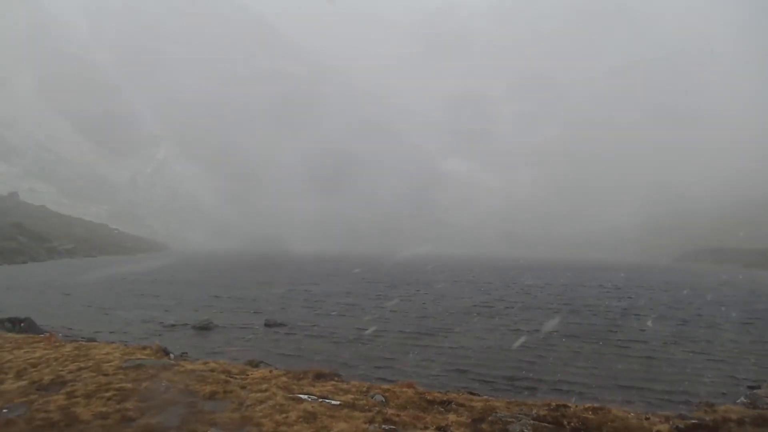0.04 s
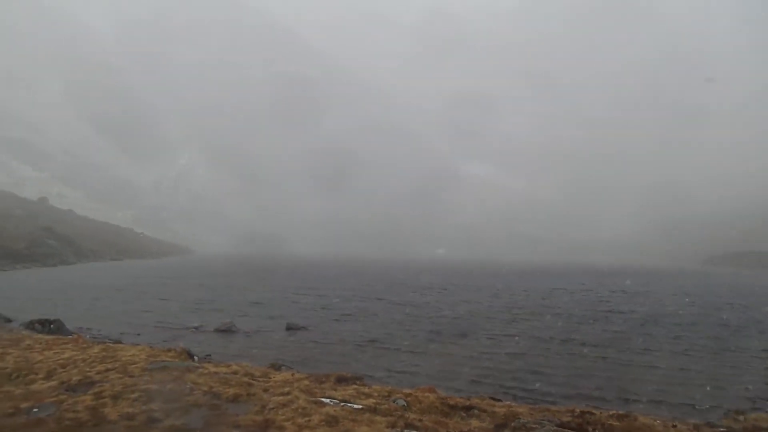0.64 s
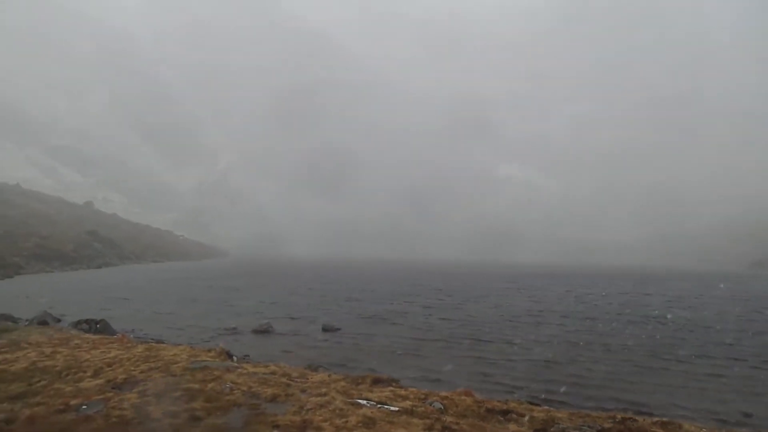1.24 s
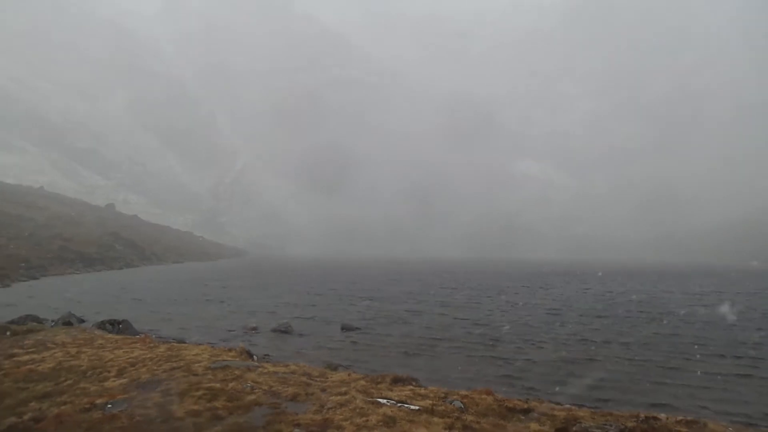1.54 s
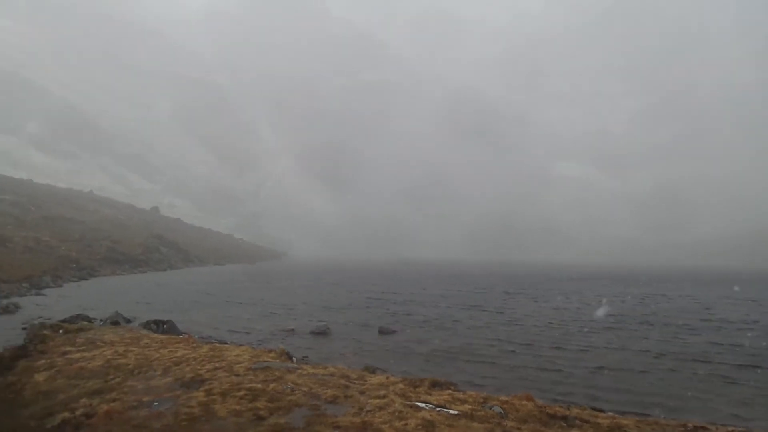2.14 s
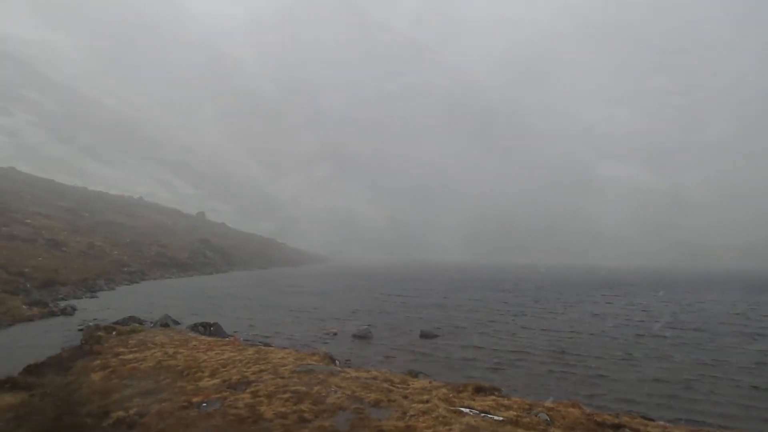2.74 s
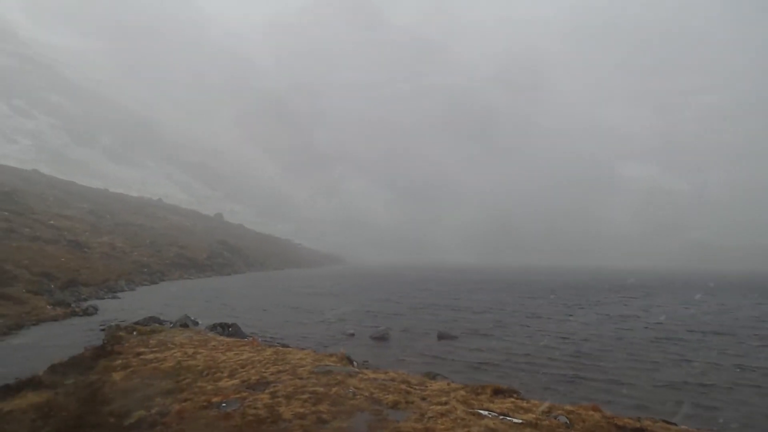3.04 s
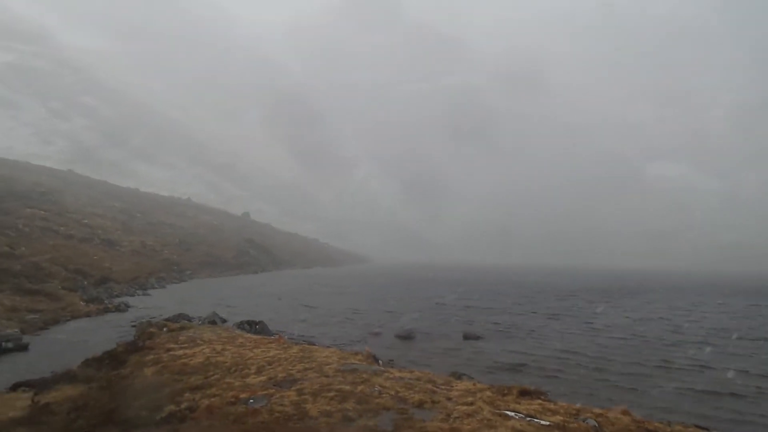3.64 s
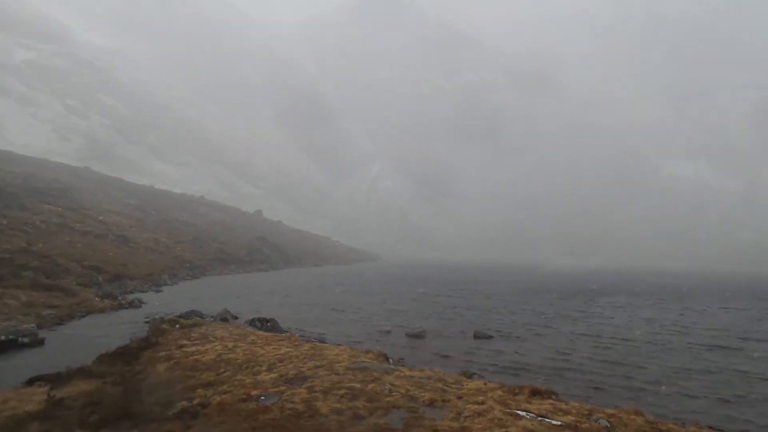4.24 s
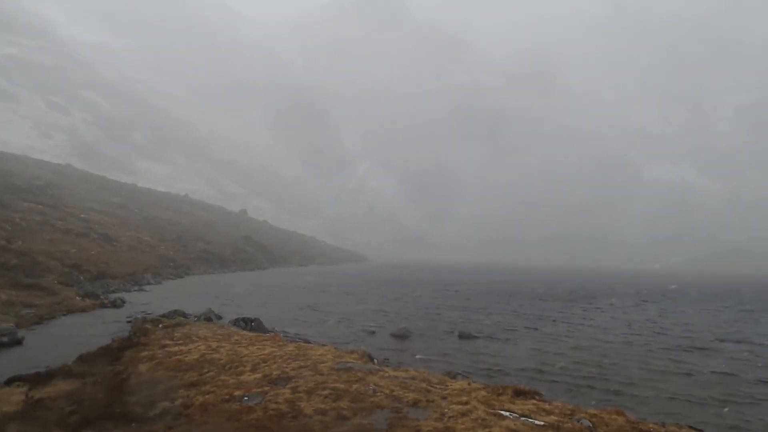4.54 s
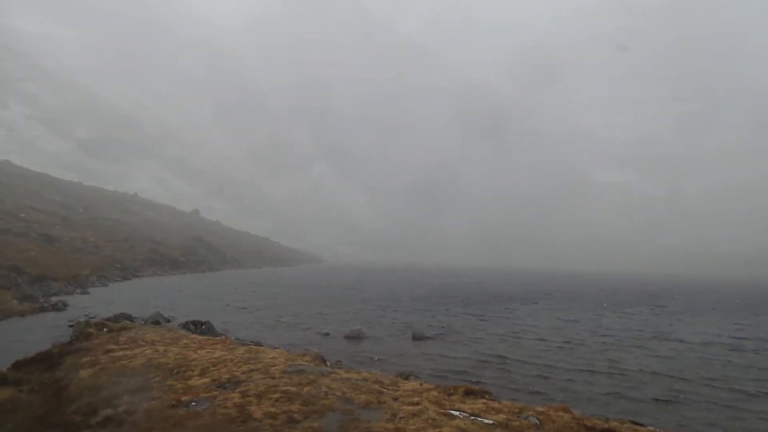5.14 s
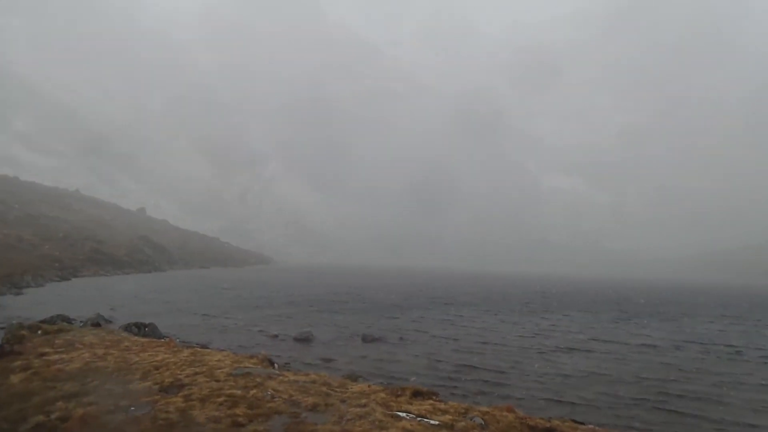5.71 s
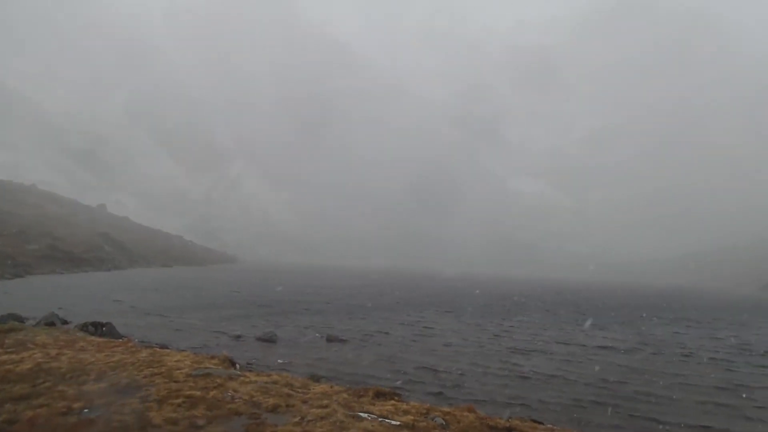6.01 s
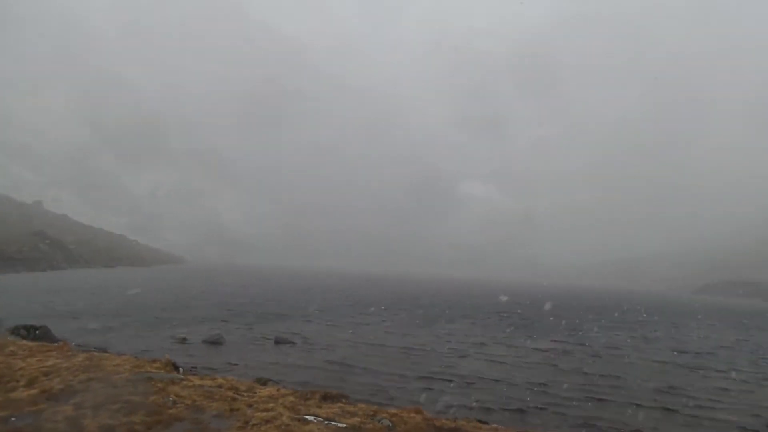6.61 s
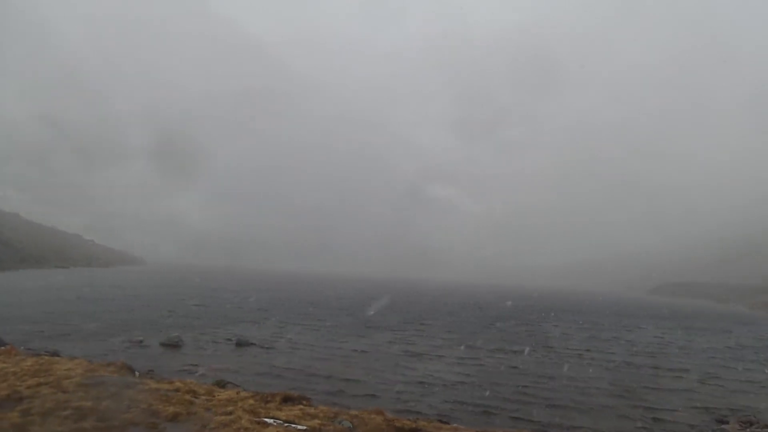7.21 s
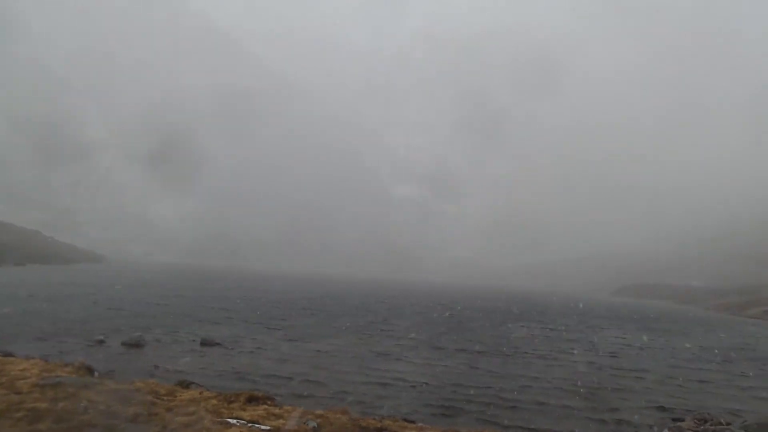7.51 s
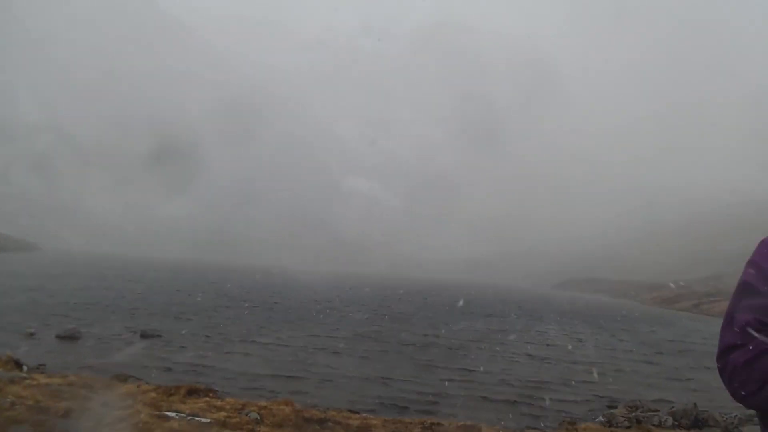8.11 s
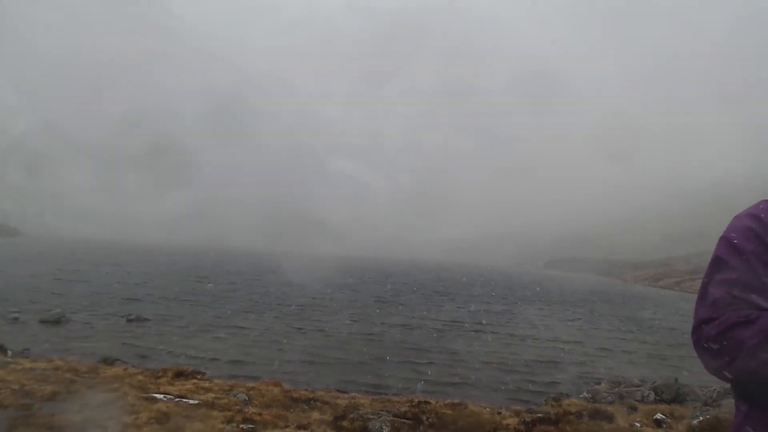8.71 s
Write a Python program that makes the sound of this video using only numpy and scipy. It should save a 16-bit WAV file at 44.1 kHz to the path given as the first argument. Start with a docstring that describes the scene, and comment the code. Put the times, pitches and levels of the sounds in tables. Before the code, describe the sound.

For about nine seconds, gusty wind buffets a microphone under a hood on a lake shore, rumbling with irregular thumps and ragged puffs. It starts strong and turns raspy in gusts around 0.3, 1 and 1.8 seconds, then again near 4.1, 6 and 6.5 seconds, with shorter surges afterward. Throughout, icy pellets tick brightly and irregularly on the microphone's housing, loudest at about 0.1, 1.8, 7.4, 8.1 and 8.9 seconds. Finer sleet patters on the jacket in small flurries, and wet flakes burst on the hood with tiny snaps. Farther off, sleet hisses steadily on water and grass over the faint wash of the lake. The sleet and wash ease between roughly 3 and 5 seconds, then build from 6 seconds, with the ticking busiest near the end. Nearly all the sound is in the left channel.

```python
"""Gusty wind rumbles and rasps while icy pellets tick and patter over a steady hiss.
Sleet is blowing across a mountain lake onto a camera held under a hood. Swirls of air (eddies) buffet
the microphone's opening (the port) and turn raspy in the gusts. Pellets tick on the camera and patter
on the jacket, and wet flakes burst on the hood. Farther off, sleet hisses on water and grass and the
lake washes softly. Nearly all of the sound is in the left channel."""
import sys
import numpy as np
from scipy import signal
from scipy.fft import rfft, irfft, next_fast_len
from scipy.io import wavfile
from scipy.ndimage import uniform_filter1d, minimum_filter1d, map_coordinates

SR = 44100
rng = np.random.default_rng(int(sys.argv[2]) if len(sys.argv) > 2 else 0)


def generate_wav(sig):
    """Save sig (samples, or channels by samples) to the path in sys.argv[1] as 16-bit PCM at SR."""
    pcm = np.round(np.clip(np.atleast_2d(sig).T, -1, 1) * 32767).astype(np.int16)
    wavfile.write(sys.argv[1], SR, pcm)


N = 395136

# strength of the wind at the port: (time [s], level [dB])
WIND = [(0.0, -25), (0.58, -23.5), (1.03, -25.0), (1.57, -24.5), (1.93, -27.5), (2.62, -21.5),
        (3.04, -24.5), (3.1, -22.0), (4.3, -26.0), (4.43, -22.5), (5.1, -25.5), (5.82, -23), (6.37, -29.0),
        (6.97, -30.0), (7.73, -26.5), (8.41, -30.0), (8.5, -23), (8.96, -24.5)]
# how thickly sleet falls; it eases while the camera is turned along the shore: (time [s], level [dB])
SLEET = [(0, -45), (1, -46.5), (2, -47), (2.8, -51.5), (3.4, -51.5), (3.8, -48.5), (4.2, -50.5),
         (4.85, -52.5), (5.8, -46.5), (6.7, -45), (7.8, -43), (8.25, -43.5), (8.5, -47.5), (8.96, -41.5)]
# tone of the small, raspy eddies: (frequency [Hz], level [dB])
RASP_TONE = [(100, -60), (250, -7.5), (420, -2), (650, -3), (1000, -9.5), (1500, -19.5), (2200, -29.5),
             (3500, -38), (7000, -89), (10000, -120)]
# tone of the far sleet and of the camera's buzzing shell: (frequency [Hz], level [dB])
HISS_TONE = [(1500, -40), (2700, -13), (3300, -7), (3900, -6), (4800, -.5), (5400, 0), (5900, -4),
             (6500, -12), (8000, -18), (9500, -22), (15500, -25)]
USUAL_WIND_DB, USUAL_RASP_DB, USUAL_SLEET_DB = -24, -32.5, -46


def wind(rasp_gain_db=-2, waver_db=.78):
    """Eddies sweep past the port with a low buffet and a rasp: faster air is both louder and higher."""
    # tone of the slow, rumbling eddies: (frequency [Hz], level [dB])
    buffet_tone = [(12, -43), (25, -43), (45, -12), (65, -7.5), (110, -2), (200, -3), (300, -6), (430, -11),
                   (700, -22), (1300, -71), (3000, -120)]
    buffet_db, rasp_db = gusts()
    flutter = unit(np.tanh(unit(wobble(80) + wobble(170)) / 2))  # air speed jumps from eddy to eddy
    lumps = amp(2.1 * flutter)
    grit = amp(3.7 * flutter + 2.1 * wobble(450))
    buffet_waver_db, rasp_waver_db = waver_db * np.tanh([wobble(24), wobble(24)])
    slow_eddies = coloured(rng.standard_normal(2 * N), buffet_tone)
    # running through a noise faster raises its pitch
    swept = map_coordinates(slow_eddies, [np.cumsum(np.sqrt(lumps))], mode="wrap")
    buffet = amp(buffet_db + buffet_waver_db) * unit(lumps * swept)
    force = amp(rasp_db + rasp_gain_db + buffet_waver_db + rasp_waver_db) * unit(grit)
    mean_speed = 1.05 * amp(.3 * (curve(WIND) - USUAL_WIND_DB))
    speed = mean_speed * np.clip((force / amp(USUAL_RASP_DB)) ** .12, .5, 2)
    small_eddies = coloured(rng.standard_normal(2 * N), RASP_TONE)
    rasp = force * map_coordinates(small_eddies, [np.cumsum(speed)], mode="wrap")
    return buffet + rasp


def gusts(rasp_growth=1.9, ceiling_db=-25):
    """Buffet and rasp levels in dB: the rasp swings wider than the wind, up to a soft ceiling."""
    # gusts and lulls: (middle [s], length [s], buffet lift [dB], rasp lift [dB])
    swells = [(0.059, 0.18, 5.5, 3.5), (0.163, 0.027, -2, -7), (0.232, 0.049, 4.5, 4), (0.339, 0.11, 7, 7),
              (0.632, 0.16, 1, 4.5), (0.817, 0.048, 5.5, 8), (1.001, 0.032, 4, 9), (1.039, 0.044, -3.5, -5),
              (1.281, 0.12, 2, 4), (1.422, 0.091, 0, 6), (1.578, 0.087, 4.5, 8), (1.751, 0.064, 0, -6),
              (1.814, 0.037, 5.5, 13), (2.652, 0.29, 1, -5), (2.882, 0.14, 2, 1), (3.218, 0.21, 2.5, -2.5),
              (3.365, 0.1, 0.5, 3.5), (3.456, 0.071, -2, -4), (3.704, 0.14, 4.5, 2),
              (4.113, 0.28, 5.5, 10.5), (4.278, 0.085, -5, -4), (5.148, 0.088, 0.5, -3),
              (5.773, 0.059, 3, 1), (5.958, 0.14, 7, 7), (6.111, 0.039, 7, 4.5), (6.473, 0.075, 8, 18),
              (6.597, 0.096, 4, 14), (6.663, 0.071, 4, 12), (6.861, .2, 0.5, 5), (7.079, 0.22, 4.5, 7),
              (7.255, 0.053, -4, -2), (7.318, 0.045, 6.5, 7), (7.423, 0.05, 8.5, 8), (7.68, 0.034, 2, 7.5),
              (7.847, 0.2, 3.5, 2.5), (8.017, 0.056, -8, -3), (8.084, 0.059, 9, 7), (8.168, 0.041, -5, -3),
              (8.267, 0.17, 4, 7.5), (8.409, 0.058, -0.5, -4.5), (8.567, 0.061, -3, -4), (8.635, 0.1, 6, 3),
              (8.727, 0.0504, -0.5, -4)]
    buffet_db = curve(WIND)
    rasp_db = USUAL_RASP_DB + rasp_growth * (buffet_db - USUAL_WIND_DB)
    for s, length_s, buffet_lift_db, rasp_lift_db in swells:
        swell = bell(s, length_s)
        buffet_db += buffet_lift_db * swell
        rasp_db += rasp_lift_db * swell
    return buffet_db, rasp_db - np.logaddexp(0, rasp_db - ceiling_db)


def thumps(gain_db=-1, width_cycles=.5, slowing=.26):
    """A large eddy thumps on the port: the pressure swings back and forth, slowing as it passes."""
    # large eddies with no rasp: (middle [s], level [dB], pitch at the middle [Hz])
    large_eddies = [(0.094, -10, 214), (0.122, -7.5, 293), (0.184, -10, 183), (0.237, -13, 168),
                    (0.443, -11, 178.6), (1.194, -5, 226.8), (1.236, -7, 252.6), (1.416, -13, 130),
                    (1.545, -11.5, 166.8), (2.378, -8.5, 205.8), (2.686, -11, 179), (2.838, -10, 207.8),
                    (3.249, -8.5, 352), (3.348, -8.5, 142.6), (3.742, -11, 171.6), (3.91, -13, 181),
                    (3.936, -11, 271), (4.144, -10.5, 185.4), (4.405, -18, 197.3), (4.572, -7.5, 333),
                    (4.818, -13, 115.7), (5.754, -5, 148), (5.901, -9.5, 140.3), (6.084, -11, 195.3),
                    (6.466, 0, 353), (7.064, 0, 279.6), (7.421, -13, 185.2), (7.688, -2, 200.7),
                    (7.886, -9.5, 163.8), (8.084, -12, 278.8), (8.215, -8.5, 203), (8.511, -8, 158.7),
                    (8.874, -10.5, 272)]
    track, t = np.zeros(N), np.arange(-SR // 40, SR // 40) / SR
    for s, db, hz in large_eddies:
        turns = hz * t
        swing = np.sin(2 * np.pi * (turns - slowing * np.log(np.cosh(turns)) + rng.random()))
        add(track, s + t[0], amp(db + gain_db) * swing * np.exp(-(turns / width_cycles) ** 2))
    return track


def puffs(burst_db=-3, push_db=-8, crack_db=-28, rise_s=.001686, drain_s=.0031, delay_s=.003003):
    """A sharp eddy makes a ragged burst with one swing of pressure; the fastest also crack brightly."""
    # eddies that flap on the port: (time [s], level [dB], speed [times the usual])
    flaps = [(0.025, -13, 1.2), (0.074, -14, 1.4), (0.11, -12, 0.71), (0.234, -19, 1.2),
             (0.293, -9.5, 1.26), (0.326, -10, 1.63), (0.347, -9, 1.4), (0.427, -13.5, .85),
             (0.514, -12.5, 1.54), (0.565, -13, 1.13), (0.589, -14, 0.91), (0.618, -13, 1.36),
             (0.638, -10.5, 1.2), (0.66, -4.5, 1.54), (0.712, -13, 1.26), (0.81, -15, 1.77),
             (0.817, -12, 2.2), (0.834, -12, 1.84), (0.905, -12.5, 1.05), (0.969, -25, 1.17),
             (0.994, -11, 2.4), (0.999, -18, 1.7), (1.024, -18, 1.06), (1.064, -16, 0.95),
             (1.191, -16, 1.15), (1.279, -12, 1.35), (1.413, -10.5, 1.24), (1.466, -22, 1.65),
             (1.555, -8.5, 1), (1.577, -10.5, 1.8), (1.595, -21, 1.38), (1.622, -17, 1.4),
             (1.681, -14.5, 1.12), (1.804, -11, 1.48), (1.814, -12, 1.36), (2.008, -20, 1.14),
             (2.121, -19, 1.06), (2.337, -14, 1.05), (2.352, -15, 0.83), (2.55, -11, 2.14),
             (2.637, -16, 1.85), (2.682, -12, 0.98), (2.716, -12.5, 1.84), (2.783, -16.5, 1.5),
             (2.802, -11.5, 1.27), (2.83, -15, 1.05), (2.912, -14.5, 1.71), (2.976, -17, 1.33),
             (3.115, -14.5, 1.85), (3.149, -18, 1.95), (3.247, -15, 1.2), (3.294, -13.5, 1.2),
             (3.34, -10, 1.82), (3.374, -7.5, 1.26), (3.4, -13, 1.75), (3.5, -17, 1.4), (3.628, -17, 0.9),
             (3.666, -18, 2.1), (3.809, -14.5, 1.6), (3.908, -18, 1.4), (4.019, -17, 1.32),
             (4.054, -10, 1.31), (4.072, -5, 1.25), (4.097, -10.5, 2.65), (4.108, -15, 1.9),
             (4.119, -21, 2), (4.127, -14, 1.34), (4.22, -16, 1.3), (4.363, -14, 1.24),
             (4.475, -11.5, 1.34), (4.57, -12.5, 1.5), (4.595, -12.5, 1.77), (4.619, -20.5, 1.5),
             (4.656, -16.5, 1.5), (4.732, -18, 0.94), (4.771, -19, 1.08), (4.876, -18, 1.37),
             (4.911, -21, 1.6), (4.968, -19, 1.21), (5.084, -19.5, 1.1), (5.234, -14.5, 1.12),
             (5.293, -19, 0.94), (5.342, -13.5, 1.05), (5.392, -14.5, 0.74), (5.436, -14.5, .95),
             (5.612, -11, 0.87), (5.687, -13.5, 1), (5.753, -11, 1.18), (5.819, -14, 1.35),
             (5.933, -9, 1.54), (5.938, -7.5, 1.6), (5.956, -14, 1.5), (5.979, -7.5, .94),
             (6.009, -12, 1.3), (6.1, -22, .8), (6.184, -27, 1.2), (6.201, -20, 0.92), (6.324, -24.5, 0.93),
             (6.456, -13.5, 1.49), (6.467, -11.5, 1.5), (6.482, -12.5, 1.15), (6.496, -17, 0.96),
             (6.579, -16, 0.73), (6.601, -13, 0.88), (6.659, -10, 1.23), (7.06, -15, 0.91),
             (7.094, -33, 0.74), (7.172, -22.5, 1.05), (7.224, -21, 0.84), (7.311, -21, .95),
             (7.319, -21, 1.2), (7.417, -11, 1.15), (7.534, -26, 1.04), (7.64, -30, 1.3),
             (7.682, -12, 0.73), (7.746, -19, 0.85), (7.811, -27, 0.88), (8.081, -15.5, 0.65),
             (8.107, -28, .9), (8.204, -25, 1), (8.259, -13, .75), (8.33, -17.5, 1.15), (8.354, -21, 1.04),
             (8.484, -15, 0.83), (8.54, -14, 0.86), (8.607, -24, 0.74), (8.639, -15.5, 0.93),
             (8.657, -20, 1.12), (8.759, -16, 0.9), (8.793, -22, 0.99), (8.868, -17, 0.8),
             (8.885, -22, 0.87), (8.918, -19.5, 1.2)]
    # tone of the tearing air: (frequency [Hz], level [dB])
    crack_tone = [(1000, 2), (2200, 2), (4000, 5), (5300, 9), (6800, -27), (12000, -60)]
    track, t = np.zeros(N), np.arange(-SR // 50, SR // 30) / SR
    rasp = coloured(rng.standard_normal(N), RASP_TONE) * amp(7.5 * np.tanh(wobble(500)))
    tearing = coloured(rng.standard_normal(N), crack_tone)
    swell = 1 / (np.exp(-t / rise_s) + np.exp(t / drain_s))
    swell /= swell.max()
    for s, db, speed in flaps:
        passed = np.cumsum(speed * (.7 + .307 * swell))  # the air is fastest at the top of the swell
        burst = swell * map_coordinates(rasp, [s * SR + passed], order=1, mode="wrap")
        from_centre = t * np.sqrt(speed) / .0008  # a faster eddy gives a shorter push
        push = 2 * from_centre * np.exp(-from_centre ** 2)
        crack = (speed / 2) ** 4 * swell ** 2 * np.roll(tearing, -round(s * SR))[:len(t)]
        puff = amp(burst_db) * burst / np.abs(burst).max() + amp(push_db) * push + amp(crack_db) * crack
        add(track, s + delay_s + t[0], amp(db) * puff)
    return track


def ticks(gain_db=1.2, hard_db=6.5, shell_db=-24, rise_s=.000083, delay_s=.0011):
    """A pellet rings the port and faintly buzzes the camera's shell; hard ice adds a bright crack."""
    # large pellets that hit the camera: (time [s], level [dB], ring pitch [Hz], hardness [dB])
    large_pellets = [(0.1125, -22.5, 5460, -29), (0.1471, 3, 4570, -9), (0.204, -16.5, 5400, -23),
                     (0.2804, -15.5, 5800, -22), (0.3627, -11.5, 5330, -28), (0.411, -14.5, 5090, -13),
                     (0.4688, -8.5, 5405, -13), (0.571, -15, 5950, -12), (0.747, -20, 5250, -29),
                     (0.955, -10, 6010, -28), (1.025, -19, 5050, -39), (1.148, -19, 5500, -24),
                     (1.1583, -9.5, 5970, -41), (1.318, -21, 5200, -38), (1.3786, -10.5, 4890, -12),
                     (1.425, -14.5, 5170, -31), (1.481, -14.5, 6130, -33), (1.843, 2, 5133, -13),
                     (1.9146, -25, 5300, -35), (1.99, -15, 5410, -38), (2.007, -14.5, 5900, -18),
                     (2.3954, -19.5, 5530, -24), (2.7904, -16, 4818, -40), (2.841, -21, 5100, -35),
                     (2.8578, -16, 5150, -36), (3.4077, -22, 5620, -25), (3.423, -22, 5180, -36),
                     (3.4423, -25.5, 5494, -33), (3.552, -20, 5540, -13), (3.6, -22, 5300, -34),
                     (3.6364, -20, 4700, -27), (3.6414, -25, 5450, -33), (4.1645, -22, 5610, -26),
                     (4.424, -25.5, 5500, -28), (4.6986, -26, 5204, -34), (4.8753, -16.5, 4935, -41),
                     (5.1983, -18.5, 5395, -24), (5.5554, -11.5, 4900, -22), (5.558, -13.5, 5360, -37),
                     (5.8626, -26, 5420, -24), (6.072, -11.5, 5444, -24), (6.146, -27, 5510, -10),
                     (6.189, -24.5, 5400, -14), (6.4127, -20, 5530, -16), (6.5267, -21, 5310, -26),
                     (6.5695, -16, 5416, -25), (6.6236, -6.5, 5934, -16), (6.767, -23, 5360, -34),
                     (6.908, -19, 5120, -31), (7.043, -10, 5360, -11), (7.132, -13, 5360, -47),
                     (7.1654, -20, 5365, -34), (7.197, -16, 5074, -25), (7.376, -2, 5740, -17.5),
                     (7.4821, -8, 5250, -24), (7.6834, -10, 4700, -35), (7.7707, -18, 5494, -40),
                     (7.9042, -10, 5370, -33), (8.117, -11, 5550, -38), (8.1319, 6, 4866, -8),
                     (8.1346, -13, 5040, -29), (8.1496, -11.5, 5230, -33), (8.2, -14, 5270, -42),
                     (8.23, -13, 5490, -21), (8.249, -17.5, 5120, -37), (8.2811, -5.5, 4720, -24),
                     (8.301, -18, 5280, -36), (8.452, -11, 4980, -42), (8.4632, -22, 5270, -29),
                     (8.6591, -19, 5527, -28), (8.6654, -18, 5610, -20), (8.76, -24, 5650, -26),
                     (8.6922, -12, 5856, -33), (8.7745, -11.5, 5070, -35), (8.804, -11.5, 5510, -23),
                     (8.8475, -23, 5625, -37), (8.8662, -10, 6114, -22), (8.8683, -9, 6000, -39),
                     (8.9003, 7.5, 4870, -26.5)]
    # the port's high notes, woken by hard ice: (pitch [Hz], level [dB], time to fade by 60 dB [s])
    port_notes = [(7500, -1, .0012), (9400, 2, .0017), (12000, -16, .001), (15000, -11, .0016)]
    track, t = np.zeros(N), np.arange(SR // 40) / SR
    ring_fade, crack_fade, shell_fade = [amp(-60 * t / fade_s) for fade_s in (.0015, .0009, .016)]
    for s, db, ring_hz, hardness_db in large_pellets + small_pellets():
        ring = np.sin(2 * np.pi * ring_hz * t) * ring_fade * (1 - np.exp(-t / rise_s))
        high_notes = np.zeros(len(t))
        for hz, note_db, fade_s in port_notes:
            fade = amp(note_db + rng.normal(0, 2) - 60 * t / fade_s)
            high_notes += fade * np.sin(2 * np.pi * hz * rng.normal(1, .035) * t)
        crack = crack_fade * rng.standard_normal(len(t))
        tick = ring + amp(hardness_db + hard_db) * (high_notes + crack)
        # the pellet touches again as it crumbles, which gives each tick its own tone
        again_s, again_share = rng.uniform([.0003, .15], [.0011, .6])
        tick += again_share * np.interp(t - again_s, t, tick, left=0)
        shell = amp(shell_db) * shell_fade * coloured(rng.standard_normal(len(t)), HISS_TONE)
        add(track, s + delay_s, amp(db + gain_db) * (tick / np.abs(tick).max() + shell))
    return without_lows(track)


def small_pellets(count=30, over_sleet_db=19):
    """Lighter pellets hit the camera at random, more strongly where the sleet is thicker."""
    when = rng.uniform(0, N / SR, count)
    size, pitch, ice = np.clip(rng.standard_normal((count, 3)), -2, 2).T
    db = np.interp(when, *np.transpose(SLEET)) + over_sleet_db + 2 * size
    ring_hz, hardness_db = 5400 + 450 * pitch, -31 + 6 * ice
    return list(zip(when, db, ring_hz, hardness_db))


def splashes(light_count=190, over_sleet_db=14, usual_hz=8000, scatter=.31, crumble_s=.0013):
    """A wet flake bursts into six crumbs that snap on the fabric, each at its own pitch."""
    # wet flakes that burst on the hood: (time [s], level [dB], typical pitch [Hz])
    wet_flakes = [(0.606, -18.5, 8250), (1.201, -24, 6230), (1.551, -22, 6000), (1.653, -26, 6700),
                  (1.709, -29, 5900), (1.97, -30, 7100), (2.123, -30, 6400), (2.181, -35, 7125),
                  (2.248, -29, 7220), (2.494, -25, 6320), (3.895, -27, 6570), (4.26, -34, 7000),
                  (4.439, -27, 7107), (5.009, -29, 6300), (5.044, -30, 8100), (5.588, -24, 7400),
                  (5.667, -25, 5900), (5.863, -24.5, 6700), (6.893, -21, 6600), (6.944, -21, 8750),
                  (6.96, -23, 7200), (6.98, -26, 7690), (7.163, -23, 7500), (7.225, -22, 6620),
                  (7.305, -20, 8310), (7.418, -25, 8426), (7.781, -25, 6700), (7.849, -22, 6660),
                  (7.92, -31, 6925), (7.952, -26, 7990), (8.001, -22, 7506), (8.525, -20.5, 7800),
                  (8.927, -27, 5884)]
    track, t = np.zeros(N), np.arange(SR // 50) / SR
    sleet_db = curve(SLEET)
    fallen = np.cumsum(amp(2 * sleet_db))  # lighter flakes land at random, more in thicker sleet
    when = np.searchsorted(fallen, rng.random(light_count) * fallen[-1])
    size, pitch = np.clip(rng.standard_normal((2, light_count)), -2, 2)
    light_db = sleet_db[when] + over_sleet_db + 2 * size
    light_flakes = list(zip(when / SR, light_db, usual_hz * np.exp(scatter * pitch)))
    crumbs = np.arange(6)
    for s, db, hz in wet_flakes + light_flakes:
        lands_s = (crumbs > 0) * rng.exponential(crumble_s, len(crumbs))
        crumb_hz = np.clip(hz * np.exp(scatter * rng.standard_normal(len(crumbs))), 4500, 15000)
        turns = crumb_hz[:, None] * np.maximum(t - lands_s[:, None], 0)
        snaps = np.sin(2 * np.pi * turns) * np.exp(-turns / .77)
        burst = amp(-4 * np.sqrt(crumbs)) @ snaps  # add the crumbs up, each weaker than the last
        add(track, s, amp(db) * burst / np.abs(burst).max())
    return without_lows(track)


def patter(count=3800, level_db=-53, growth=.52, flicker_db=2, contact_s=.0003):
    """Tiny pellets hit hood and jacket: many faint snaps and a few clear ones, more in thicker sleet."""
    thickness_db, flurry_db = curve(SLEET) - USUAL_SLEET_DB, flurries()
    time_draw, size_draw = rng.random((count, 2)).T
    fallen = np.cumsum(amp((thickness_db + flurry_db) / 2))
    when = np.searchsorted(fallen, time_draw * fallen[-1])
    size = amp(5.8 * np.minimum(-np.log(1 - size_draw), 3.4))
    hits = np.bincount(when, size, N) * amp(flicker_db * wobble(28))
    fading_hits = signal.lfilter([1], [1, -np.exp(-1 / (contact_s * SR))], hits)
    # tone of pellets on fabric: (frequency [Hz], level [dB])
    fabric_tone = [(1500, -35), (3000, -17), (4000, -10), (4700, -1), (5500, 0), (6800, -6), (8000, -7.5),
                   (9500, -11), (11000, -13), (12500, -14.5), (14000, -13), (15500, -14)]
    snaps = coloured(fading_hits * rng.standard_normal(N), fabric_tone)
    return amp(level_db + growth * thickness_db + flurry_db) * clumped(snaps, patchy_db=2.6)


def flurries():
    """Flurries shake extra sleet onto the hood; this gives the lift in dB."""
    # short showers: (middle [s], length [s], lift [dB])
    showers = [(0.404, .07, 5), (0.886, .1, 6.5), (1.424, .18, 4), (1.677, .1, 3), (2.22, .2, 3),
               (2.563, .12, 3), (2.868, .12, 4.5), (3.417, .04, 7.5), (3.649, .07, 7), (3.912, .12, 3),
               (4.234, .08, 4), (4.677, .08, 3), (5.219, .05, 3.5), (5.515, .2, 3), (5.884, .08, 6.5),
               (6.144, .17, 3), (6.433, .08, 3), (7.157, .08, 3), (7.897, .1, 2.5), (8.259, .08, 3),
               (8.802, .1, 3.5)]
    return sum(lift_db * bell(s, length_s) for s, length_s, lift_db in showers)


def far_sleet(gain_db=.13, shimmer_db=.9, flurry_share=.33):
    """Countless far pellets on water and grass merge into a hiss."""
    level_db = curve(SLEET) + gain_db + shimmer_db * wobble(110) + flurry_share * flurries()
    hiss = coloured(rng.standard_normal(N), HISS_TONE)
    return amp(level_db) * clumped(hiss, patchy_db=3.1)


def lake(gain_db=1, swell_db=1):
    """Waves and wind on the choppy lake make a soft, gently swelling wash."""
    # the wash, faint while the camera is turned along the shore: (time [s], level [dB])
    loudness = [(0, -51.5), (1.3, -55.5), (2, -55), (2.8, -57), (4.8, -63.5), (6, -54), (6.9, -54),
                (7.55, -51), (8.1, -50), (8.4, -53), (8.65, -49.5), (8.96, -50.5)]
    # tone of the wash: (frequency [Hz], level [dB])
    wash_tone = [(200, -40), (600, -10), (1200, -1), (1700, 2.5), (2200, 7.5), (2700, -3), (3500, 4),
                 (6000, -25)]
    level_db = curve(loudness) + gain_db + swell_db * wobble(5.1)
    return amp(level_db) * coloured(rng.standard_normal(N), wash_tone)


def clumped(x, patchy_db):
    """Grains land in clumps, each lifting its own range of pitches for a few milliseconds."""
    spectra = signal.stft(x, nperseg=128)[2]
    patches = uniform_filter1d(rng.standard_normal(spectra.shape), size=4, axis=0)  # smooth over pitch
    patches = uniform_filter1d(patches, size=7, axis=1)  # and over time
    return unit(signal.istft(spectra * amp(patchy_db * unit(patches)), nperseg=128)[1][:N])


def without_lows(x, edge_hz=4300):
    """A tiny hit gives off almost no low sound."""
    return filtered(x, lambda hz: 1 / (1 + (edge_hz / (hz + 1)) ** 10))


def amp(db):
    """Turn decibels into a multiplier."""
    return 10 ** (np.asarray(db) / 20)


def unit(x):
    """Scale x to an average strength (rms) of 1."""
    return x / np.sqrt(np.mean(x ** 2) + 1e-20)


def curve(rows):
    """Join (time, value) points with straight lines, one value per sample."""
    return np.interp(np.arange(N) / SR, *np.transpose(rows))


def bell(s, length_s):
    """A swell from 0 to 1 and back, highest at time s."""
    reach = length_s * np.linspace(-2, 2, 81)
    return np.interp(np.arange(N) / SR, s + reach, np.exp(-(2 * reach / length_s) ** 2))


def wobble(rate):
    """A smooth curve through `rate` random points a second."""
    return map_coordinates(rng.standard_normal(int(N * rate / SR) + 4), [np.arange(N) * rate / SR])


def filtered(x, response):
    """Multiply each frequency in x by response(hz)."""
    size = next_fast_len(len(x) + 8192)
    return irfft(rfft(x, size) * response(np.fft.rfftfreq(size, 1 / SR)), size)[:len(x)]


def coloured(x, tone):
    """Shape x with a tone table, at an average strength of 1."""
    points_hz, db = np.transpose(tone)
    return unit(filtered(x, lambda hz: amp(np.interp(np.log(hz + 1), np.log(points_hz), db))))


def add(track, s, sound):
    """Mix a short sound into a track at time s."""
    part = track[max(round(s * SR), 0):][:len(sound)]
    part += sound[:len(part)]


def scene(left_db=6, right_db=-55.5):
    """One microphone feeds the left channel; only a trace leaks into the right."""
    mix = wind() + thumps() + puffs() + ticks() + splashes() + patter() + far_sleet() + lake()
    return mix * amp([[left_db], [right_db]])


def record(dry):
    """The camera turns the level down briefly after the biggest peaks and cuts the highest treble."""
    ceiling, top_hz = .97, 16000
    needed_gain = np.minimum(1, ceiling / (np.abs(dry).max(axis=0) + 1e-9))
    held_gain = minimum_filter1d(needed_gain, size=601, origin=260)
    gain = uniform_filter1d(held_gain, size=64)
    return np.array([filtered(side * gain, lambda hz: hz < top_hz) for side in dry])


dry = scene()
out = record(dry)
generate_wav(out)
```